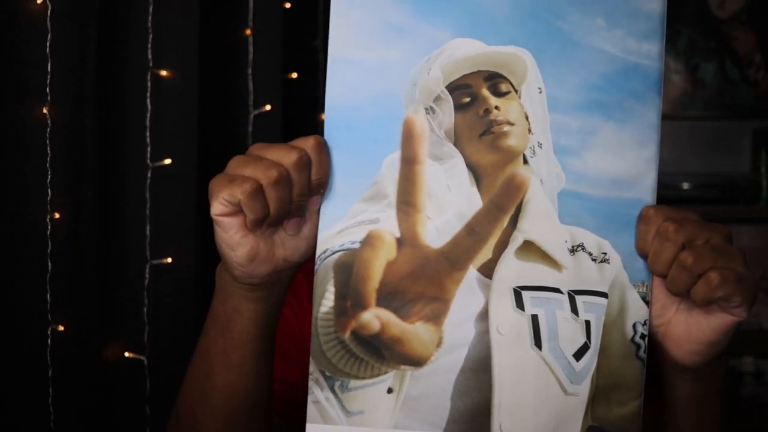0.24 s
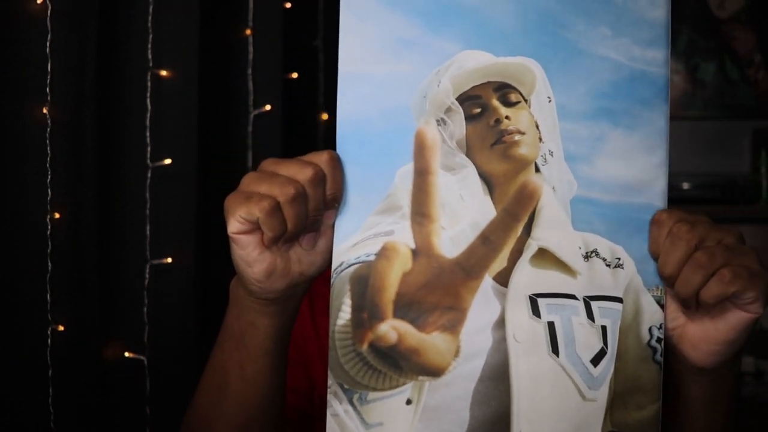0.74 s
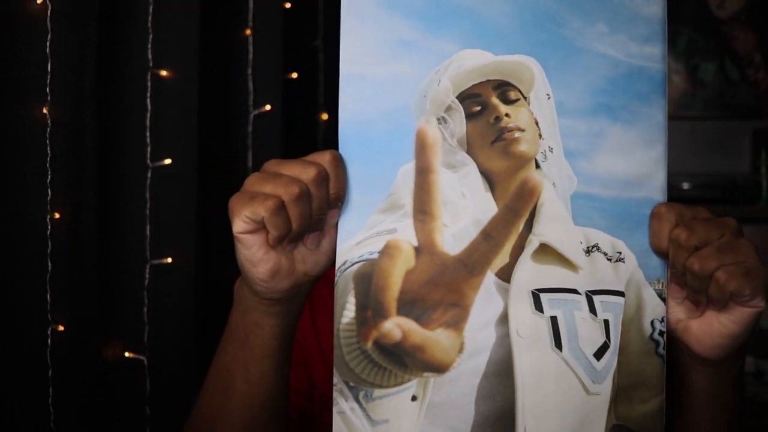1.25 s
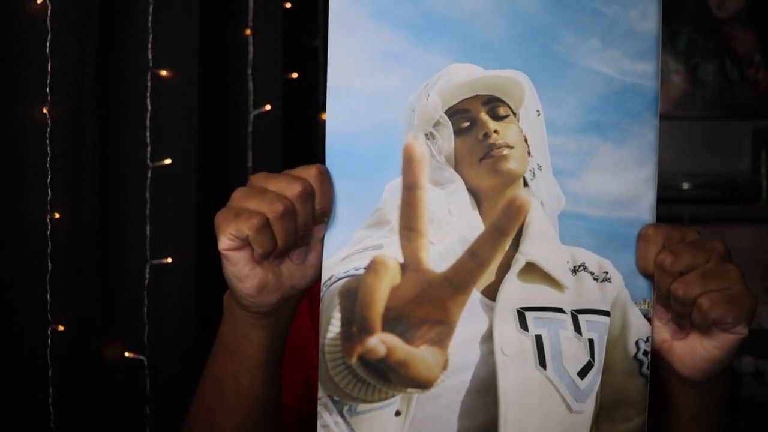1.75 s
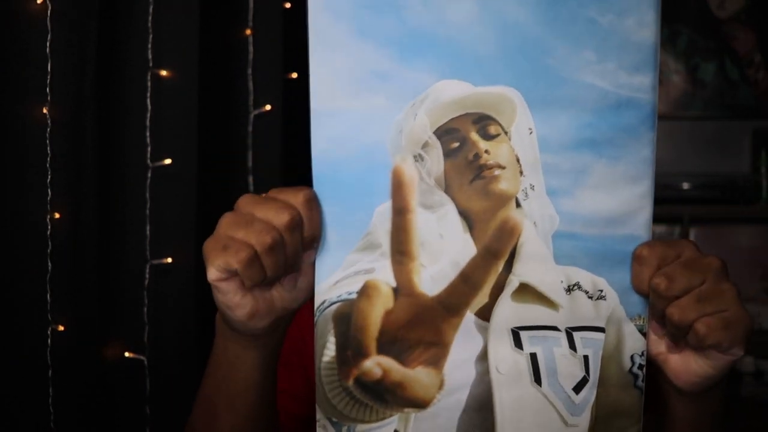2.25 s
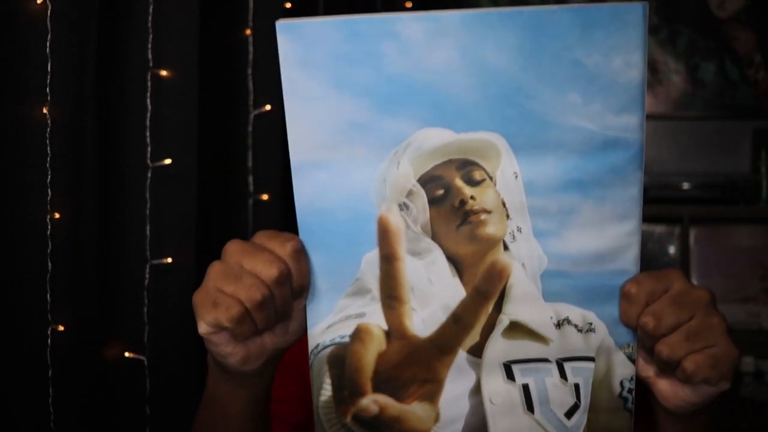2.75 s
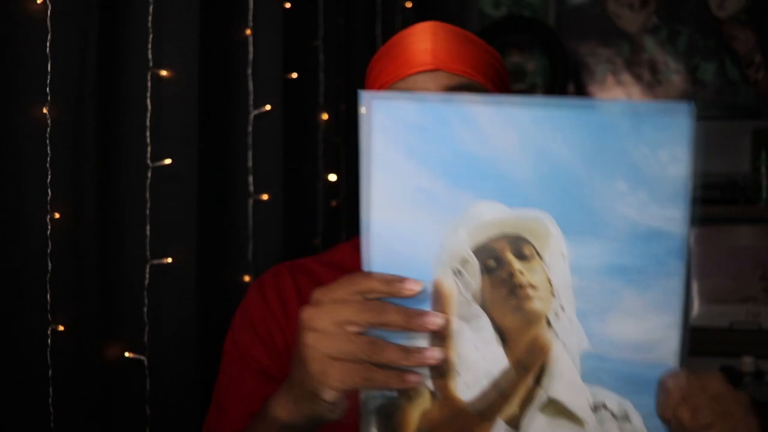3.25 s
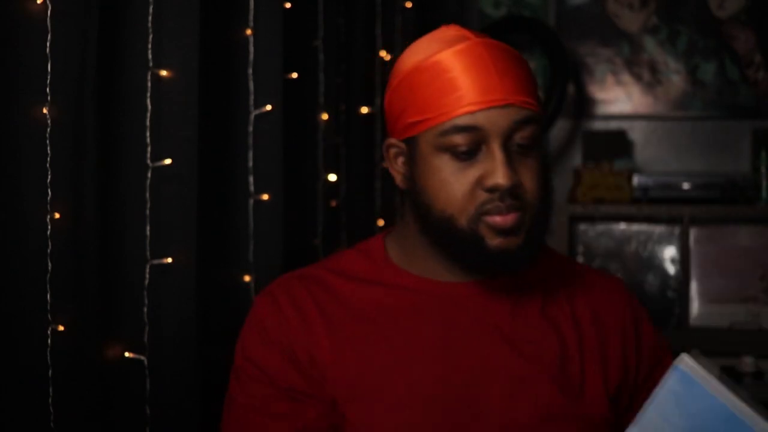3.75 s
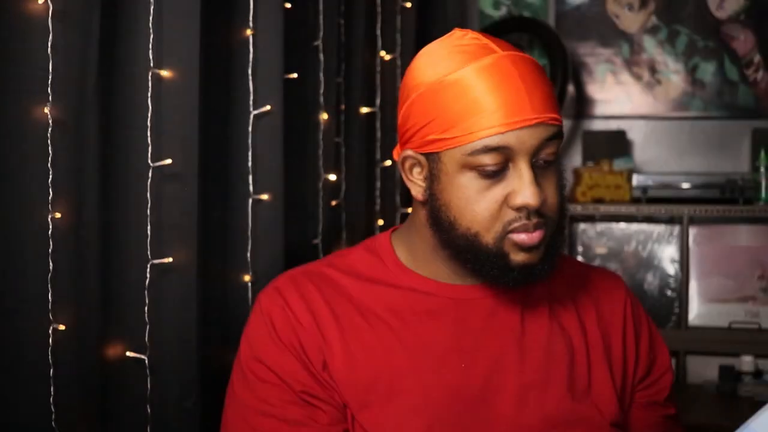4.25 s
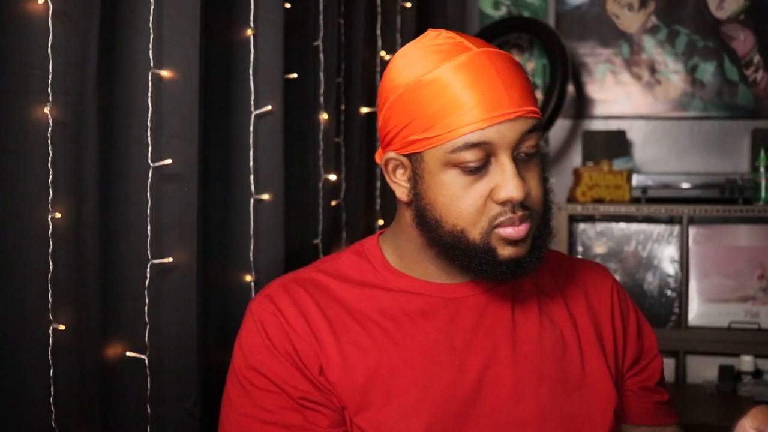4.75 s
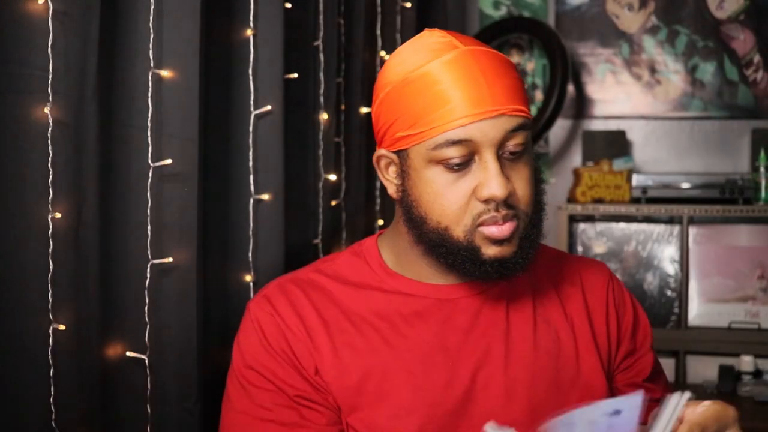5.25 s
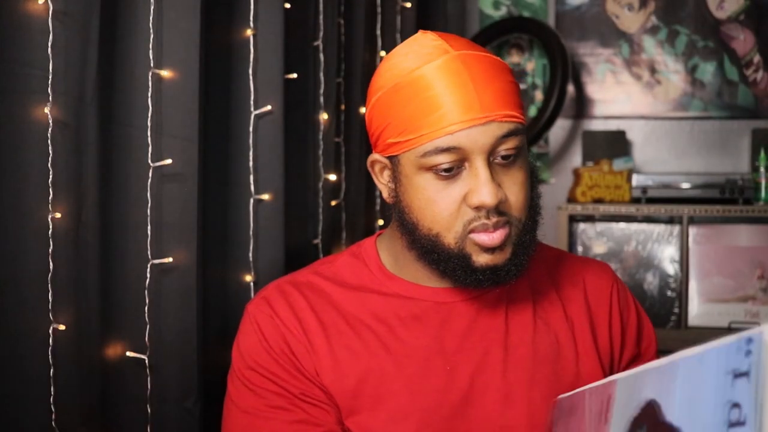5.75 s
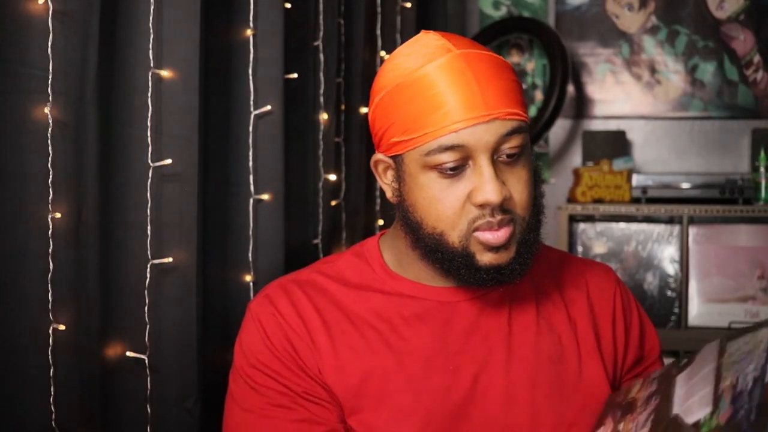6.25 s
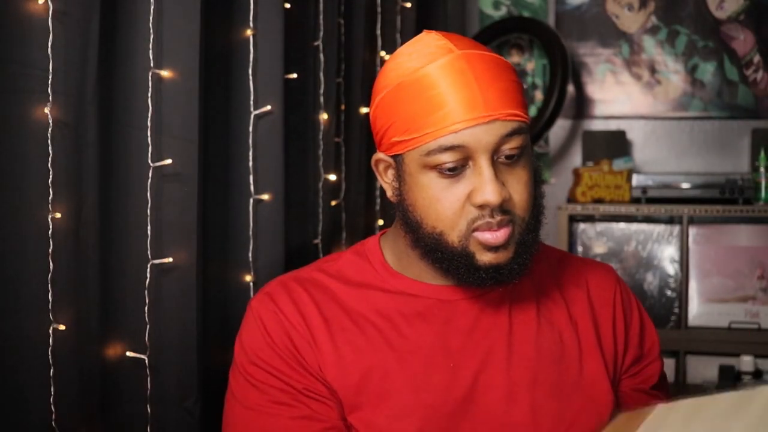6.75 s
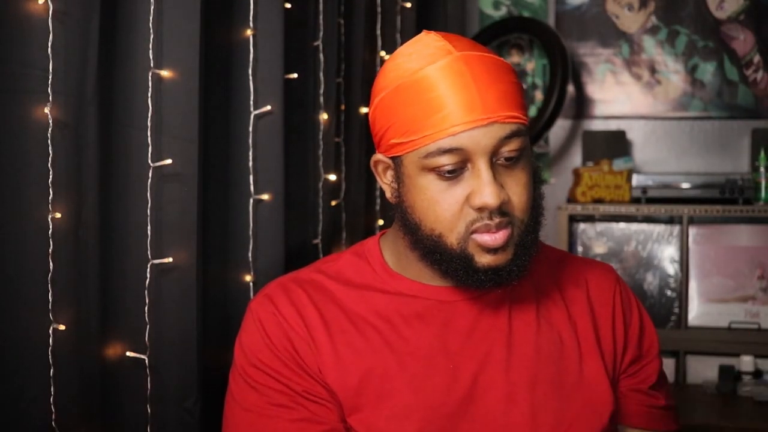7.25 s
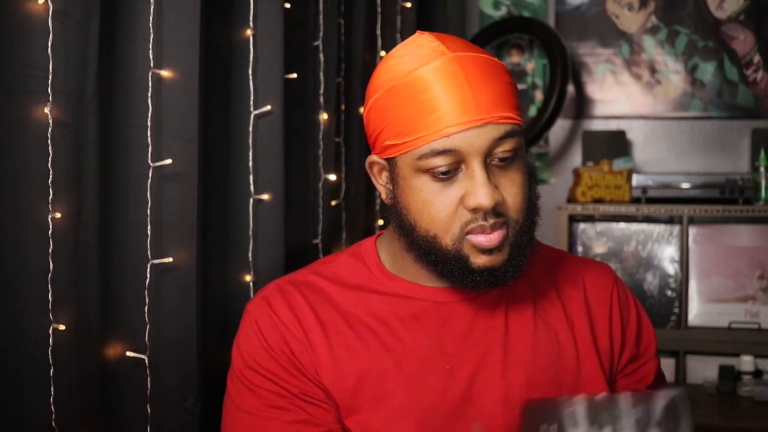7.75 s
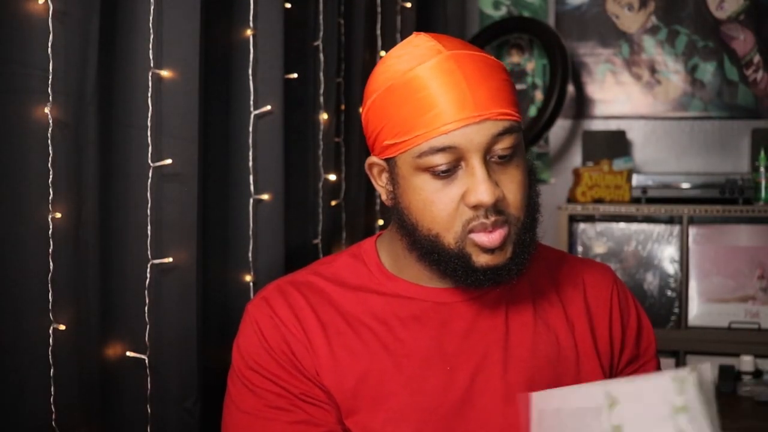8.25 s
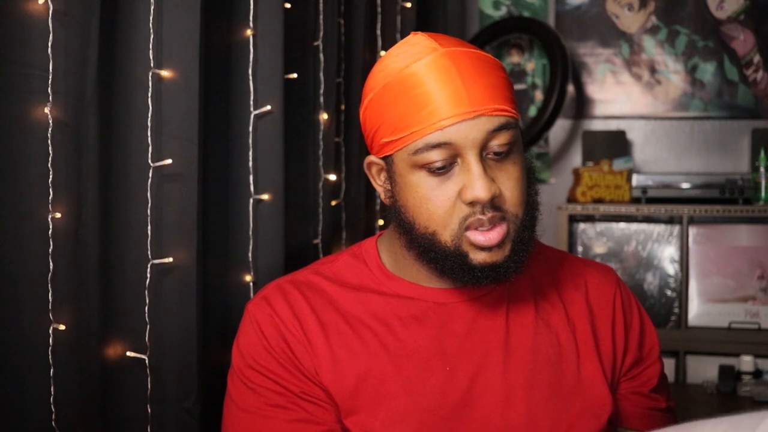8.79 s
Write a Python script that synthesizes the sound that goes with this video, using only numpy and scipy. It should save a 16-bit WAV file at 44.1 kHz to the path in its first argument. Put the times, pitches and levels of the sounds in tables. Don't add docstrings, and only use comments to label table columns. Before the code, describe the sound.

Close stereo pickup of stiff glossy paper in a small room. Nearly three seconds of steady low hum, with a soft grip noise and a muffled engine swelling far off; then a bright pop, a swish and loud ringing creases as the sheet is lowered. Page after page follows, with dull flaps, dry crackles, thumb flutters, a faint skin squeak and sharp little ticks to the end.

```python
import sys
import numpy as np
from scipy import signal
from scipy.fft import rfft, irfft, next_fast_len
from scipy.io import wavfile
from scipy.ndimage import uniform_filter1d

SR = 44100
rng = np.random.default_rng(int(sys.argv[2]) if len(sys.argv) > 2 else 0)


def magnitude_from_level(level_db):
    exponent = np.asarray(level_db, float) / 20
    return 10 ** exponent


def log_audio(samples):
    frames = np.atleast_2d(samples).T
    limited = np.clip(frames, -1, 1)
    pcm = np.round(limited * 32767).astype(np.int16)
    wavfile.write(sys.argv[1], SR, pcm)


N = 397782

# f/Hz, density/dB
FAN_SPECTRUM = [(13, -65), (22, -34), (48, -2.5), (87, -7), (115, -3.5), (213, -3.5), (252, -11), (339, -9),
                (369, -11.5), (420, -8.5), (602, -15.5), (1190, -23.5), (1970, -35.5), (3500, -44.5),
                (4550, -85), (7700, -120)]
# f/Hz, width/Hz, level over the fan spectrum/dB
ROOM_MODES = [(36, 4, -10), (54.3, 7.2, 4), (115, 7, 0.5), (145.5, 11.6, 4.5), (209.5, 7.8, 1),
              (225.2, 12.5, -3), (263, 30, 1.5), (338, 11.3, 7), (424, 14, 3), (474, 35, 1.5),
              (531.5, 28, 4), (767, 120, -7.5), (1167, 123, 3.5), (1486, 61, 5.5)]
# f/Hz, density/dB
HISS_SPECTRUM = [(880, -29), (1500, -4), (1780, -7), (2320, -13), (4290, -16), (7920, -21.5),
                 (11200, -28.5), (14000, -28), (16000, -31)]
# f/Hz, coefficient/1
LIKENESS = [(60, 1), (130, 0.97), (290, 0.99), (640, 0.86), (1410, 0.48), (3100, -0.59), (6820, -0.02),
            (15000, -0.06)]
# f/Hz, level/dB
FAN_LEANING = [(60, 1.5), (180, 1.0), (550, 1.0), (1650, 3), (4970, 0), (15000, 0.5)]
# f/Hz, rms level/dB
HUM_LINES = [(36.7, -52), (59.2, -43.5), (113.7, -47), (120.1, -49), (227.4, -48.5), (340.8, -54),
             (650.4, -68), (1300.4, -70)]

# peak t/s, skin hiss level/dB, time to fade 10 dB/s
GRIPS = [
    (.66, -64, .022),
    (.745, -65, .05),
    (.96, -62, .022),
    (1.022, -64, .022),
]
# peak t/s, gloss hiss level/dB, time to fade 10 dB/s, dullness/dB
GLIDES = [(3.17, -63, 0.1, 5), (3.35, -45.5, 0.05, 0.5), (3.39, -47, .022, 0), (3.56, -52.5, 0.14, 2),
          (3.625, -52, .04, 6), (3.685, -51, 0.035, 8), (3.83, -58, 0.05, 0), (3.87, -51.5, 0.23, 2),
          (4.069, -41, 0.036, 3.5), (4.42, -57.5, 0.15, -2), (4.55, -68, 0.5, 14), (4.755, -51, .04, 3),
          (4.92, -56.5, 0.84, 1.5), (5.16, -53, .07, -2.5), (5.255, -47, 0.07, -3), (5.39, -56.5, 0.2, 4),
          (5.71, -56, 0.05, 3.5), (5.91, -54, 0.09, 5), (6.02, -57, 0.12, 3), (6.14, -75, .04, 12),
          (6.49, -63, .04, 1.5), (6.76, -49, 0.1, 0), (6.86, -62, 0.2, 5), (7.06, -65, 0.08, 2),
          (7.285, -61, 0.05, 10), (7.35, -81, 0.14, 7), (7.41, -61, .02, -2), (7.49, -56.5, .03, 0),
          (7.58, -56, .02, -2), (7.67, -56.5, 0.05, 1), (7.86, -75, 0.7, 7), (7.95, -75, 0.04, 9),
          (8.01, -77, 0.2, 9), (8.185, -54, 0.03, 6), (8.228, -60, -0.01, 4), (8.37, -56, .025, 3),
          (8.62, -62, 0.06, 4), (8.76, -60, 0.025, -2)]
# peak t/s, level/dB, time to fade 10 dB/s
FLAPS = [(3.17, -50, 0.12), (3.36, -40, 0.01), (3.54, -56, 0.3), (3.67, -48, 0.26), (3.87, -57, 0.7),
         (4.069, -40, 0.0752), (4.42, -49.5, 0.24), (4.55, -43, -0.13), (4.745, -41, -0.2), (4.98, -53, 2),
         (5.22, -41, -0.4), (5.39, -43, 0.09), (5.69, -40, -0.05), (5.91, -43, -0.1), (6.03, -44.5, .12),
         (6.15, -40.5, 0.05), (6.5, -62, 0.5), (6.65, -57, 0.1), (6.81, -46.5, 0.08), (7.06, -54, -0.1),
         (7.28, -42.5, 0.07), (7.5, -52.5, 0.2), (7.87, -42, -0.1), (8.01, -44, 0.06), (8.17, -59, 0.08),
         (8.36, -43, -0.13), (8.58, -56.5, 0.5), (8.7, -52, 0.1)]
SHEET_LEANS = [-0.77, -0.23, 1.0, -1.7]

# t/s, knock peak level/dB, ring level/dB, air level/dB
SNAPS = [(0.704, -38.5, -54, -44), (3.516, -28.5, -38, -64), (3.667, -25, -31.5, -47),
         (3.706, -31.5, -46, -58), (3.903, -33, -43, -47), (4.004, -36, -45, -53), (4.131, -40, -44, -51),
         (5.588, -35, -38.5, -52), (6.032, -37, -44, -50), (6.057, -36, -51, -59), (6.092, -39, -50, -66),
         (6.476, -36, -60, -49), (6.976, -39, -42, -45), (7.046, -36, -41, -42), (7.292, -37, -44, -59),
         (7.481, -42, -51, -52), (7.529, -49, -45.5, -48.5), (7.642, -51, -43.5, -57),
         (8.148, -35, -38, -44),]
# t/s, knock peak level/dB, ring f/Hz, ring level/dB, air level/dB
TAUT_SNAPS = [(4.046, -25.5, 3200, -32.5, -39), (4.403, -31.5, 2700, -29, -48.5),
              (4.504, -65, 3600, -43, -62), (4.7115, -30, 3200, -33, -28), (4.968, -33, 1500, -50, -56),
              (3.84, -50, 3650, -38, -50), (5.878, -42, 4800, -46, -43), (6.728, -50, 1800, -42.5, -50),
              (5.75, -39, 2500, -47, -58), (5.98, -47, 3200, -44, -62), (6.822, -40, 3700, -43, -52),
              (7.063, -53, 4400, -47, -45), (7.333, -29, 3700, -57, -64), (6.884, -36, 4350, -41, -39),
              (7.578, -46, 6000, -54, -53), (7.49, -52, 7000, -60, -51), (8.343, -32.5, 3900, -32.5, -36)]
# t/s, knock peak level/dB, ring f/Hz, ring level/dB, air level/dB
POPS = [
    (3.165, -29, 5500, -40, -31),
    (3.811, -24, 4450, -23.5, -24),
]
# t/s, knock peak level/dB, ring f/Hz, ring level/dB, air level/dB
SOFT_FOLDS = [(5.346, -34, 4300, -36, -47), (5.663, -37, 2320, -46, -49), (6.125, -31.5, 3020, -41, -60),
              (6.632, -40, 3250, -51, -63), (7.446, -42, 4500, -56, -50), (7.562, -44, 3800, -56, -48),
              (7.677, -46, 5440, -58, -52), (7.947, -31.5, 2400, -41, -68), (8.556, -38, 2320, -47.5, -62),
              (8.718, -33, 2320, -55, -58), (8.177, -36, 2300, -39.5, -54), (8.207, -32, 2300, -35, -42)]
# t/s, knock peak level/dB, knock f/Hz, air over knock level/dB
FLUTTERS = [(3.151, -39.5, 971, 3), (3.779, -40, 1650, 2), (3.787, -33, 1590, -2.5), (4.062, -31, 1670, -9),
            (5.347, -25.5, 1780, -21), (5.353, -25, 1600, -28), (5.367, -31, 2000, -15),
            (5.392, -29.5, 1680, -31), (5.872, -44, 1990, 6.5), (6.116, -32, 1620, -64),
            (6.132, -31, 794, -21), (6.728, -46, 837, 2), (7.236, -37.5, 820, -33),
            (7.334, -25.5, 885, -46), (7.34, -29, 1380, -43), (7.349, -26.5, 840, -44),
            (7.366, -27.5, 865, -44), (7.399, -62, 1040, 14.5), (7.672, -42, 795, -14),
            (7.816, -36, 864, -38), (7.852, -32, 816, -19), (7.927, -29, 1290, -31),
            (7.944, -29, 1460, -40), (7.99, -30, 1200, -39), (8.163, -41, 790, -17), (8.217, -41, 751, 0),
            (8.352, -43, 1700, 4), (8.588, -42, 778, -5), (8.62, -42, 1030, -6), (8.694, -33, 850, -49),
            (8.715, -32, 860, -46), (8.722, -38, 1350, -40), (8.75, -43, 853, -10)]
# t/s, peak level/dB, lowest f/Hz
TICKS = [
    (0.705, -33, 6700),
    (1.008, -39, 5500),
    (4.48, -49, 7000),
    (4.6548, -34, 10000),
    (6.9014, -37, 6700),
    (8.3504, -31, 6700),
    (8.4128, -42, 6700),
    (8.7092, -26, 12000),
]

# start t/s, length/s, level/dB
HALF_ORDER_SWELLS = [
    (.95, 0.65, -44),
    (1.8, 0.59, -48),
    (2.9, 0.47, -47),
]
# start t/s, length/s, level/dB
DRONE_SWELLS = [
    (1.62, .2, -36),
    (1.9, 0.44, -39.5),
    (2.35, 0.49, -33.5),
    (2.84, 0.24, -36.5),
    (3.08, 0.21, -31.5),
    (3.41, 0.23, -38.5),
]
# t/s, ring f/Hz, peak level/dB
CRACKLES = [(3.166, 6000, -31), (3.785, 3600, -34), (3.792, 1600, -29), (3.812, 900, -28),
            (4.011, 1500, -37), (4.712, 900, -31), (4.969, 1000, -31), (5.671, 2000, -37),
            (5.688, 1700, -36), (6.634, 2600, -42), (6.735, 2000, -39), (6.826, 2000, -39),
            (7.050, 1600, -36), (7.243, 1600, -38), (4.712, 4500, -36), (5.169, 1400, -39),
            (5.208, 1500, -36), (5.299, 1400, -38), (5.350, 5000, -36), (5.359, 4300, -32),
            (5.367, 4200, -38), (5.378, 3500, -41), (5.405, 2200, -36), (5.413, 3400, -41),
            (6.061, 2600, -42), (6.092, 1800, -38), (6.117, 3900, -40), (6.126, 3100, -31),
            (6.132, 2800, -34), (6.130, 6500, -46), (6.143, 2900, -37), (6.167, 3500, -46),
            (7.447, 3000, -42), (7.453, 5000, -46), (7.484, 2200, -43), (7.564, 3500, -43),
            (7.568, 4200, -43), (7.573, 5000, -43), (7.581, 5600, -45), (7.648, 2100, -42),
            (7.679, 5500, -45), (7.682, 2200, -41), (7.685, 6000, -46), (7.703, 5000, -48),
            (7.860, 3500, -45), (7.930, 3400, -44), (7.936, 2400, -40), (7.944, 4200, -46),
            (7.953, 4000, -43), (7.962, 3500, -44), (8.006, 3200, -43), (8.152, 8000, -45),
            (8.173, 5000, -44), (8.181, 4500, -42), (8.212, 4600, -40), (8.226, 6500, -44),
            (8.557, 2300, -39), (8.621, 3500, -48), (8.696, 900, -30), (8.721, 850, -31)]
# peak t/s, level/dB, time to fade 10 dB/s
SQUEAKS = [
    (5.89, -56, 0.03),
    (5.95, -59, .06),
    (6.02, -60, .04),
]

PAGE_HZ = 2320
SQUEAK_HZ = 7900
ENGINE_SINKS_HZ_PER_S = 5.4
BUCKLE = 7.0


def at_hz(points, hz):
    table_hz, values = np.array(points).T[:2]
    return np.interp(np.log(hz + 1), np.log(table_hz), values)


def rms_one(x):
    return x / np.sqrt(np.mean(x ** 2) + 1e-20)


def drift(rate):
    control_hz = 400
    steps = rng.standard_normal(int(N / SR * control_hz) + 2)
    r = np.exp(-2 * np.pi * rate / control_hz)
    slow = rms_one(signal.lfilter([1], [1, -2 * r, r * r], steps))
    return np.interp(np.arange(N) * control_hz / SR, np.arange(len(steps)), slow)


def band(x, low_hz, high_hz, order=2):
    edges_hz = [low_hz, min(high_hz, .45 * SR)]
    return signal.sosfilt(signal.butter(order, edges_hz, "band", fs=SR, output="sos"), x)


def pair(mid, side, gain):
    size = next_fast_len(mid.shape[-1])
    hz = np.arange(size // 2 + 1) * SR / size
    alike = np.clip(at_hz(LIKENESS, hz), 0, 1)
    common = np.sqrt(1 + alike) * rfft(mid, size)
    opposed = np.sqrt(1 - alike) * rfft(side, size) * [[1], [-1]]
    return irfft((common + opposed) * gain(hz) / np.sqrt(2), size)[:, :mid.shape[-1]]


def fan():
    def colour(hz):
        lift = 1
        for mode_hz, width, db in ROOM_MODES:
            lift = lift + magnitude_from_level(db) / (1 + ((hz - mode_hz) / width * 2) ** 2)
        lean = at_hz(FAN_LEANING, hz) / 2 * np.array([[1], [-1]])
        low_cut = 1 + (29 / (hz + 1)) ** 8
        return magnitude_from_level(at_hz(FAN_SPECTRUM, hz) + lean) * lift / low_cut
    return magnitude_from_level(-35 + .5 * drift(4.3)) * rms_one(pair(*rng.standard_normal((2, N)), colour))


def hiss():
    def colour(hz):
        return magnitude_from_level(at_hz(HISS_SPECTRUM, hz)) * (hz > 1500)
    return magnitude_from_level(-55.5) * rms_one(pair(*rng.standard_normal((2, N)), colour))


def hum():
    t = np.arange(N) / SR
    out = np.zeros(N)
    for hz, db in HUM_LINES:
        level = magnitude_from_level(db + 1.43 * drift(1.0))
        out += np.sqrt(2) * level * np.sin(2 * np.pi * (hz * t + rng.random()))
    return out


def strokes(rows):
    power = np.zeros(N)
    for s, db, fade in rows:
        fade = max(fade, .012)
        near = np.arange(max(int((s - 5 * fade) * SR), 0), min(int((s + 5 * fade) * SR), N))
        late = (near / SR - s) / fade
        distance = np.abs(np.where(late < 0, late / 0.96, late))
        power[near] += magnitude_from_level(2 * (db - 10 * distance ** 1.2))
    return np.sqrt(power)


def friction(per_s, spread_db, clump_db):
    slip_now = rng.random(N) < per_s * magnitude_from_level(clump_db * drift(25.0)) / SR
    sizes = magnitude_from_level(spread_db * np.minimum(rng.exponential(1, N), 2.2)) * slip_now
    catches = uniform_filter1d(sizes, size=24)
    return (1.5 + rms_one(catches)) * magnitude_from_level(1.2 * drift(35.0))


def slides():
    lumpy = friction(per_s=1200.0, spread_db=4.5, clump_db=3.0)
    smooth = friction(per_s=3500.0, spread_db=3.0, clump_db=2.0)
    odd, even = rng.standard_normal((2, 2, N))
    flap_noise = band(pair(*lumpy * odd, lambda hz: 1), 700, 2300, order=3)
    rub_noise = band((lumpy + smooth) * even, 2200, 5400)
    gloss_noise = band(smooth * odd, 5000, 10300)
    skin_noise = band(smooth * even, 10000, 16500) + band(smooth * even, 12200, 15000)

    rub = [(s, db + dull, fade) for s, db, fade, dull in GLIDES]
    rub += [(s, db - 14.0, fade) for s, db, fade in GRIPS]
    gloss = [(s, db, fade) for s, db, fade, dull in GLIDES]
    gloss += [(s, db - 7.0, fade) for s, db, fade in GRIPS]
    skin = list(GRIPS)
    for s, db, fade, dull in GLIDES:
        sunk_db = 1 * (s - GLIDES[0][0])
        skin.append((s, db - 4 - 0.44 * dull - sunk_db, fade))

    out = np.zeros((2, N))
    movements = (FLAPS, rub, gloss, skin)
    noises = (flap_noise, rub_noise, gloss_noise, skin_noise)
    for rows, noise, lean_db in zip(movements, noises, SHEET_LEANS):
        lean = magnitude_from_level(np.array([[lean_db], [-lean_db]]) / 2)
        out += strokes(rows) * rms_one(noise) * lean
    return out


def aside(shape):
    def placed(x):
        left, right = shape(x)
        return np.array([magnitude_from_level(-1.5) * np.roll(left, 12), right])
    return placed


def add(out, s, envelope, shapes, click=0):
    start = round(s * SR)
    for db, shape in shapes:
        noise = rng.standard_normal((2, len(envelope)))
        shake = np.array([noise[0], 0.65 * noise[0] + 0.63 * noise[1]]) * envelope
        shake[:, 16] += click
        part = shape(shake)
        peak = np.sqrt(uniform_filter1d(np.mean(part ** 2, axis=0), size=88).max())
        out[:, start:start + len(envelope)] += magnitude_from_level(db) * part / peak


def buckle(out, air, rows, t60, crack_s, tone, click=BUCKLE):
    t = np.arange(SR // 6) / SR
    decay = np.exp(-t / crack_s) + .33 * magnitude_from_level(-60 * t / t60)
    crack = np.minimum(5 * t / crack_s, 1) * decay
    for s, knock_db, ring_hz, ring_db, air_db in rows:
        def knock(x):
            return band(x, 526, 1640, order=3)

        def ring(x):
            panel = band(x, ring_hz / 1.06, ring_hz * 1.06)
            return tone * panel + .45 * band(x, 1300, ring_hz + 1900, order=3)
        add(out, s, crack, [(knock_db - 3.0, knock), (ring_db, aside(ring)), (air_db - 4.5, air)], click)


def flutters(out, air):
    t = np.arange(SR // 6) / SR
    for s, knock_db, knock_hz, bright_db in FLUTTERS:
        rasp_db = knock_db - 9 + 0.46 * bright_db
        air_db = knock_db + bright_db
        beats = magnitude_from_level(2.5 * np.interp(t, np.arange(64) * .004, rng.standard_normal(64)))
        rattle = beats * np.minimum(t / 0.0028, 1) * magnitude_from_level(-60 * np.maximum(t - 0.008, 0) / 0.098)

        def knock(x):
            return 1.3 * band(x, knock_hz / 1.15, knock_hz * 1.25) + .36 * band(x, 650, 2200)

        def rasp(x):
            return band(x, 1840, 4300, order=4)
        add(out, s, rattle, [(knock_db - 6.5, knock), (rasp_db, aside(rasp)), (air_db - 7.5, air)])


def ticks(out):
    t = np.arange(SR // 6) / SR
    for s, peak_db, low_hz in TICKS:
        high = aside(lambda x: band(x, low_hz, 16000))
        add(out, s, np.exp(-t / 0.0013), [(peak_db - 10.0, high)], click=BUCKLE)


def creases():
    out = np.zeros((2, N + SR))
    air = aside(lambda x: band(band(x, 3900, 16000), 3600, 6400, order=1))
    snaps = [(s, knock_db, PAGE_HZ, ring_db, air_db) for s, knock_db, ring_db, air_db in SNAPS]
    buckle(out, air, snaps, t60=.11, crack_s=.0038, tone=0.7)
    buckle(out, air, TAUT_SNAPS, t60=0.21, crack_s=.0034, tone=.3)
    buckle(out, air, POPS, t60=0.24, crack_s=.0022, tone=1.1)
    buckle(out, air, SOFT_FOLDS, t60=.08, crack_s=.012, tone=1.4, click=0)
    flutters(out, air)
    ticks(out)
    return out[:, :N]


def room(x):
    t60 = 0.085
    t = np.arange(SR // 2) / SR
    noise = rng.standard_normal((2, len(t))) * np.clip((t - .004) / 0.00064, 0, 1)
    dull = band(noise, 200, 3000, order=1)
    tail = dull * magnitude_from_level(-60 * t / t60) + (noise - dull) * magnitude_from_level(-60 * t / (t60 * 0.64))
    tail = tail / np.sqrt(np.sum(tail ** 2, axis=1, keepdims=True))
    return magnitude_from_level(-7.5) * signal.fftconvolve(x, tail, axes=1)[:, :N]


def far_tone(swells, start_hz, sinks_hz_per_s):
    t = np.arange(N) / SR
    gain = np.zeros(N)
    for s, length, db in swells:
        gain += magnitude_from_level(db) * np.clip(np.minimum(t - s, s + length - t) / 0.07 + .5, 0, 1)
    hz = start_hz - sinks_hz_per_s * (t - swells[0][0])
    return np.sqrt(2) * gain * np.sin(2 * np.pi * np.cumsum(hz) / SR)


def engine():
    half_order = far_tone(HALF_ORDER_SWELLS, 79.5, ENGINE_SINKS_HZ_PER_S / 2)
    drone = far_tone(DRONE_SWELLS, 154.0, ENGINE_SINKS_HZ_PER_S)
    groan = far_tone([(4.26, 0.069, -38)], 290, 86)
    return half_order + drone + groan


def crackles():
    out, t = np.zeros((2, N + SR)), np.arange(SR // 30) / SR
    burst = np.minimum(t / .0012, 1) * np.exp(-t / .003)
    for s, hz, db in CRACKLES:
        def ring(x):
            return band(x, hz / 1.22, hz * 1.22) + .4 * band(x, hz / 2, hz * 1.4, order=4)
        add(out, s, burst, [(db - 3.0, aside(ring))])
    return out[:, :N]


def squeak():
    chatter = band(rng.standard_normal((2, N)), SQUEAK_HZ / 1.06, SQUEAK_HZ * 1.06)
    return strokes(SQUEAKS) * rms_one(chatter)


def scene():
    background = fan() + hiss() + hum() + engine()
    cracks = creases() + crackles()
    return background + slides() + cracks + room(cracks) + squeak()


def band_limit(x):
    return signal.sosfilt(signal.butter(12, 16370, fs=SR, output="sos"), x)


def record(dry):
    low_pass = signal.cheby2(16, 40, 15960, fs=SR, output="sos")
    mix = signal.sosfiltfilt(low_pass, dry)
    return band_limit(mix)


dry = scene()
out = record(dry)
log_audio(out)
```